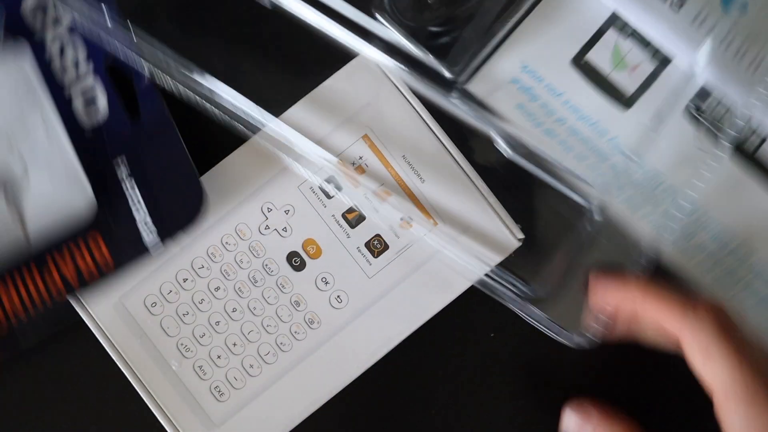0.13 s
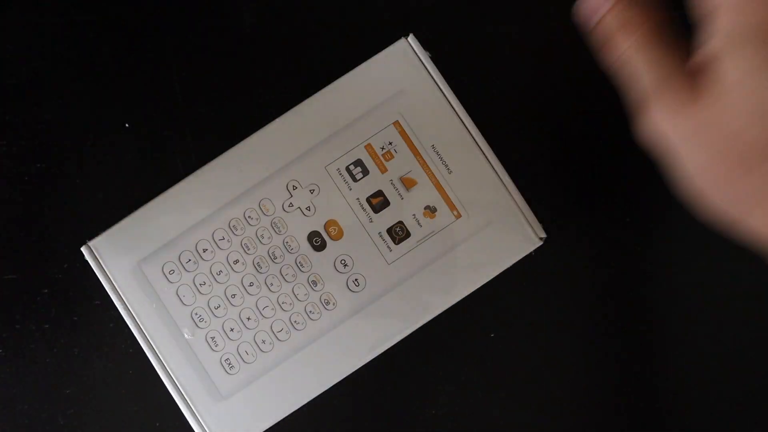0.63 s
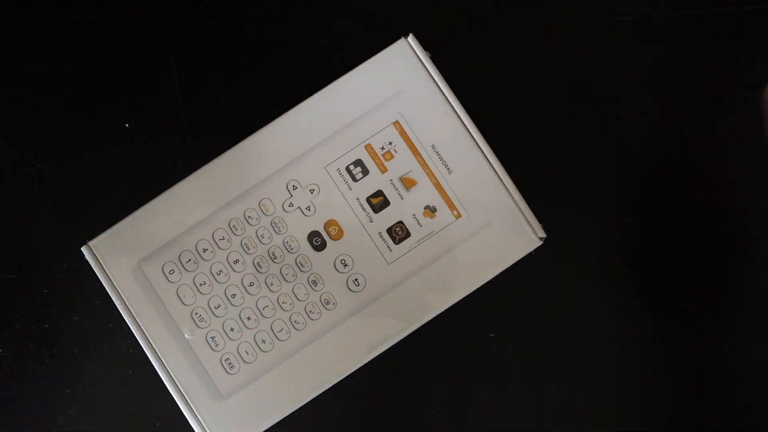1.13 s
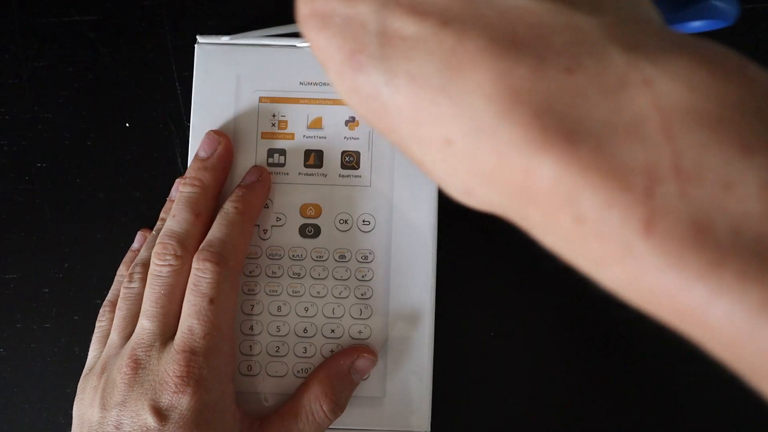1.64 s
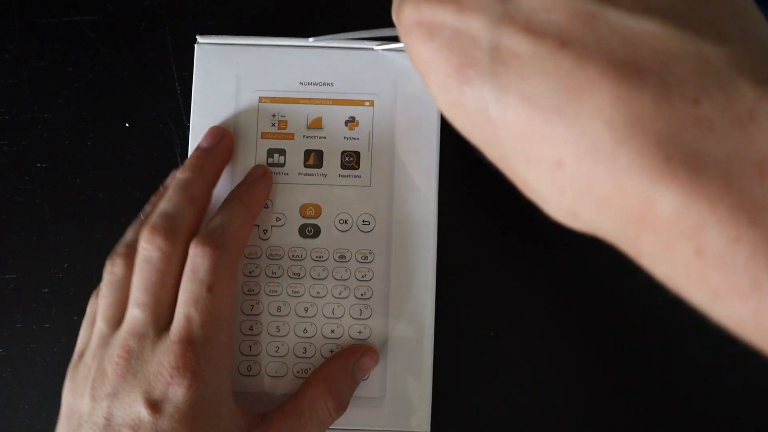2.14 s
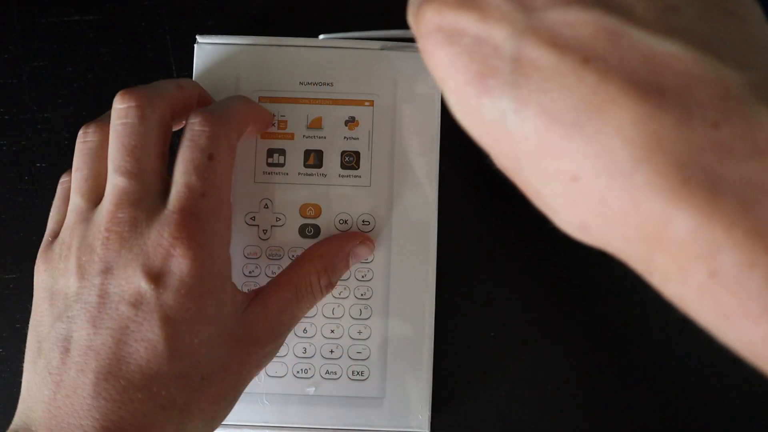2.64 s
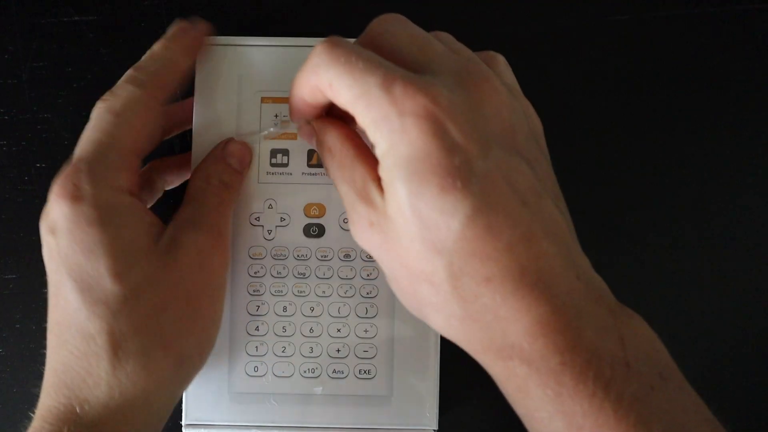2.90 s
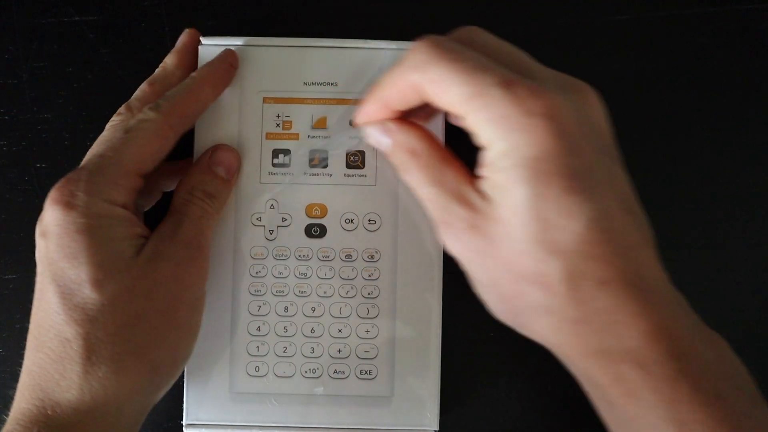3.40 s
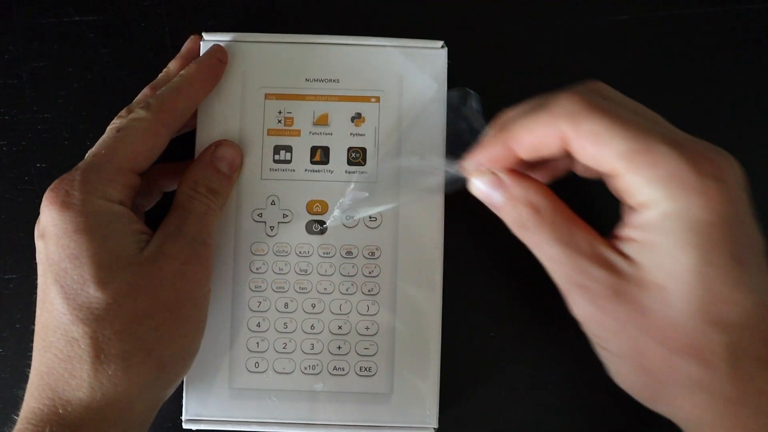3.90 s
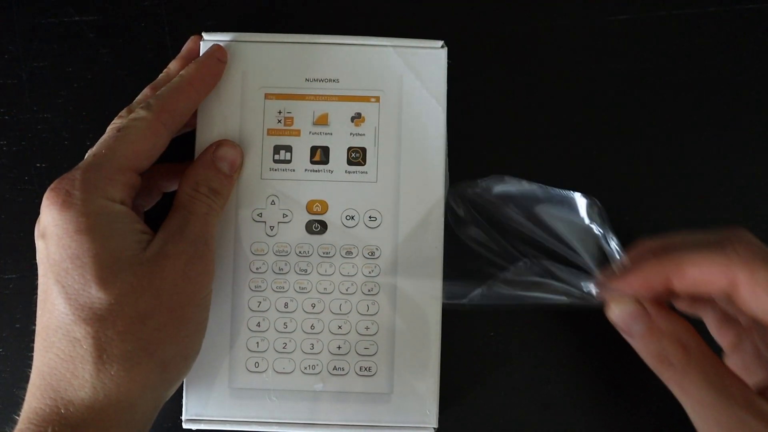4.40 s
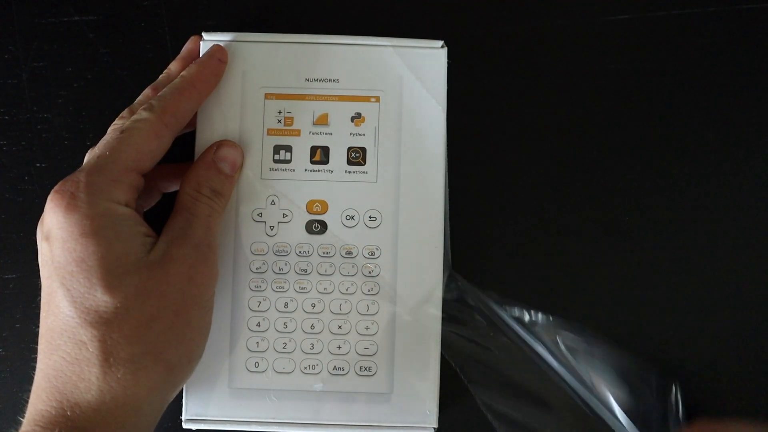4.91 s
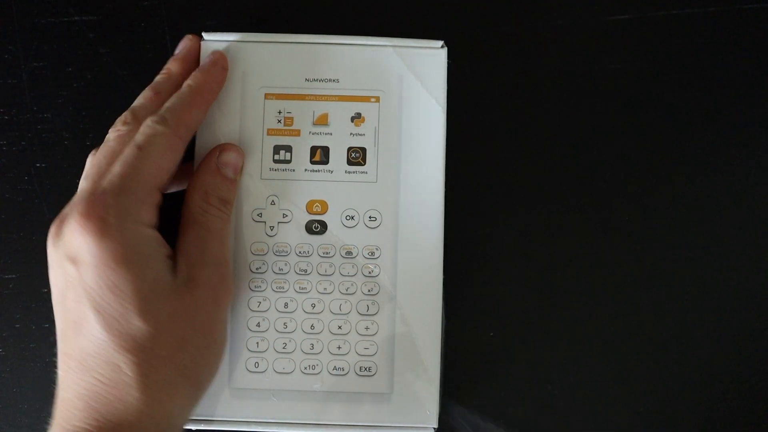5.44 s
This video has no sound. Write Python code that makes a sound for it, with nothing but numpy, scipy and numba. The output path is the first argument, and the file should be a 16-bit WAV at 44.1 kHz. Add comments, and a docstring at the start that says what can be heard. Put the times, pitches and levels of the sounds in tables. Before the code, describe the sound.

A stiff clear package is dragged away and dropped, giving dense crunches, hollow panel pops and low table knocks, the hardest overloading the close microphone. The sound is cut off suddenly. After near silence with faint hiss and rumble, clinging film comes off a box in crisp irregular snaps, with faint crinkle and soft rubbing, in a small room.

```python
"""In a small, fairly dry room, a stiff blister shell is pulled off a table, crunches, bumps it and is dropped
aside: dense crackle through shell resonances, plus ringing table and panels. A hard cut silences it.
Then fingers peel thin shrink film off a cardboard box: lone stick-slip snaps ring the box over faint crinkle,
rub and drag. Near echoes and a diffuse tail answer; hiss and rumble lie beneath; the loudest peaks clip."""
import sys
import numpy as np
from scipy import signal
from scipy.fft import rfft, irfft
from scipy.io import wavfile
from scipy.ndimage import uniform_filter1d
from numba import njit

SR = 44100
rng = np.random.default_rng(int(sys.argv[2]) if len(sys.argv) > 2 else 0)


def amplitude_ratio(level_db):
    """Convert a level in decibels to the matching linear amplitude (field) ratio."""
    exponent = np.asarray(level_db, float) / 20
    return 10 ** exponent


def store_pcm(level_fs):
    """Save levels as 16-bit WAV."""
    pcm = np.round(np.clip(level_fs, -1, 1) * 32767).astype(np.int16)
    wavfile.write(sys.argv[1], SR, np.atleast_2d(pcm).T)


N = 244755
T = np.arange(N) / SR

# Film letting go of the box. Each row: start in seconds, level in dB, film pitch in Hz, box ring in dB re level.
FILM_SNAPS = [(1.5189, -33.5, 9130, -29), (2.7404, -30.5, 4360, -16.5), (3.0284, -40, 6900, -27.5),
              (3.1351, -43, 6770, 0), (3.1777, -31.5, 7130, 3), (3.3668, -19.5, 4250, -31),
              (3.3967, -23, 8700, -17), (3.4091, -18, 6970, -19.5), (3.4303, -19.5, 8700, -38),
              (3.4513, -17, 3800, -19.5), (3.5748, -25.5, 8420, -20), (3.6979, -31, 4280, -6),
              (3.7238, -22.5, 4380, -25), (3.7494, -19.5, 4100, -21), (3.7833, -16, 4380, -25),
              (3.8337, -16, 8800, -21.5), (3.8858, -14.5, 8980, -23), (3.9416, -11.5, 9450, -25.5),
              (3.9847, -11.5, 9270, -24), (4.0176, -14, 4670, -20), (4.0592, -15, 4600, -21),
              (4.0622, -11.5, 8960, -21.5), (4.11, -15.5, 8450, -21), (4.1217, -16.5, 6046, -33),
              (4.146, -13.5, 8563, -18), (4.162, -26, 2580, -30), (4.1871, -15.5, 8070, -20),
              (4.2166, -15, 3420, -17.5), (4.2678, -24.5, 9040, -17), (4.342, -18.5, 5600, -17),
              (4.4343, -11, 6700, -16.5), (4.5514, -18.5, 7530, -10), (4.6732, -11.5, 5390, -18),
              (4.7498, -13, 7790, -19.5), (4.8415, -10, 6150, -20), (5.027, -34.5, 5750, -26),
              (5.0841, -24, 8520, -15.5), (5.1375, -13.5, 5410, -20.5), (5.1687, -19.5, 4510, -16),
              (5.214, -12.5, 5530, -25.5), (5.2397, -22.5, 4330, -13), (5.2683, -22, 6190, -15),
              (5.2951, -19, 3470, -28), (5.3271, -14.5, 3330, -21.5), (5.3498, -18, 3200, -19),
              (5.3789, -17.5, 3570, -19), (5.4036, -19, 3160, -24), (5.435, -15.5, 3210, -17),
              (5.4642, -13, 3150, -18.5), (5.4978, -16, 3320, -25), (5.5154, -22, 3290, -10.5)]
# Modes of the cardboard box. Each row: frequency in Hz, relative level in dB, t60 in seconds.
BOX_MODES = [(205, -15.5, 0.11), (406, -5, 0.03), (673, -2, 0.025), (781, -5, 0.045), (832, 3.5, 0.02),
             (1169, 4, 0.031), (1338, -9, 0.019)]


def unit(x):
    """Scale to rms 1."""
    return x / np.sqrt(np.mean(x ** 2))


def band(x, lo_hz, hi_hz):
    """Band-pass."""
    sos = signal.butter(2, [lo_hz, min(hi_hz, 0.45 * SR)], "band", fs=SR, output="sos")
    return signal.sosfilt(sos, x)


def decay(t60_s, size):
    """Exponential fall of 60 dB in t60_s."""
    return np.exp(-np.log(1000) * T[:size] / t60_s)


def decay_e(tau_s, size):
    """Exponential fall with time constant tau_s."""
    return np.exp(-T[:size] / tau_s)


def rise(rise_s, size):
    """Exponential onset with time constant rise_s."""
    return 1 - np.exp(-T[:size] / rise_s)


def ring(hz, t60_s, size):
    """One dying mode."""
    return np.sin(2 * np.pi * hz * T[:size]) * decay(t60_s, size)


def add(out, start_s, sound):
    """Mix a sound in at start_s."""
    i = int(start_s * SR)
    out[i:i + len(sound)] += sound[:N - i]


def curve(rows):
    """Columns of a table, interpolated to one value a sample."""
    s, *columns = np.transpose(rows)
    return [np.interp(T, s, column) for column in columns]


def wander(spread_db, per_s):
    """A gain that drifts at random."""
    steps = rng.standard_normal(1000)
    return amplitude_ratio(spread_db * np.interp(T * per_s, np.arange(len(steps)), steps))


def grains(per_s, spread_db, hiss):
    """Random ticks, a few much bigger than the rest, over some hiss."""
    size_db = spread_db * np.minimum(rng.exponential(size=N), 4)
    ticks = (rng.random(N) < per_s / SR) * amplitude_ratio(size_db) * rng.standard_normal(N)
    return unit(unit(ticks) + hiss * rng.standard_normal(N))


@njit
def sweep(x, hz, q):
    """State-variable band-pass whose centre can move."""
    y, band_state, low_state = np.empty(len(x)), 0., 0.
    for i in range(len(x)):
        g = np.tan(np.pi * hz[i] / SR)
        v = (band_state + g * (x[i] - low_state)) / (1 + g * (g + 1 / q))
        band_state = 2 * v - band_state
        low_state += 2 * g * v
        y[i] = v / q
    return y


def blows(rows, t60_s):
    """Soft blows ring a panel: a low note and weaker ones above it."""
    out, size = np.zeros(N), SR // 3
    for s, db, hz in rows:
        note = ring(hz, t60_s, size)
        note += 0.33 * ring(1.2 * hz, 0.84 * t60_s, size)
        note += 0.18 * ring(1.9 * hz, 1.4 * t60_s, size)
        add(out, s, amplitude_ratio(db) * note * rise(1 / hz, size))
    return out


def shell_parts():
    """Dense buckles shake the stiff sheet, heard as middle, body and edge."""
    # Each row: resonance in Hz, width in Hz, level in dB.
    resonances = [(215, 62, 10), (970, 350, 17.5), (1644, 81, 11), (1800, 17, -2), (2970, 110, 7),
                  (3667, 82, 1.5)]
    crackle = grains(2500, 0.74, 0.8)
    rings = np.zeros(N)
    for hz, width_hz, db in resonances:
        q = hz / width_hz
        rings += amplitude_ratio(db) * sweep(crackle, np.full(N, 1. * hz), q) * np.sqrt(q)
    middle = unit(band(crackle, 990, 5000)) + 0.19 * unit(band(rings, 1100, 5000))
    body = unit(band(crackle, 240, 1300)) + 0.45 * unit(band(crackle, 930, 2700))
    body += 0.58 * unit(band(rings, 100, 1300))
    edge = unit(band(crackle, 3300, 8400)) + 0.2 * unit(band(crackle, 6300, 16000))
    # a bent panel sings at a wandering pitch
    middle = unit(middle) + 0.4 * unit(sweep(crackle, 3300 * wander(3.3, 14), 5.))
    body = unit(body) + 0.42 * unit(sweep(crackle, 950 * wander(2.5, 18), 4.7))
    return [unit(middle), unit(body), unit(edge)]


def shell():
    """Flexing and bursts of buckles drive the sheet's middle, body and edge."""
    # Each row: start in seconds, level in dB, body in dB re level, edge in dB re level.
    crunches = [(0.043, -10.5, -8, 6), (0.0836, -9, -20.5, -40), (0.0901, -4.5, -13, -10),
                (0.099, 6, -12.5, 0), (0.107, -2.5, -16.5, -8.5), (0.3325, -21.5, -5, -10),
                (0.491, -27, 5, 0), (0.511, -0.5, -4, -16), (0.5177, -2.5, -2.5, -20.5),
                (0.595, -18.5, 1.5, -10.5), (0.633, -12.5, 1, -13), (0.707, -20, 4, -19),
                (0.8865, 3.5, 0.5, -6.5), (0.8908, 13.5, -13, -10), (0.918, -6, 12.5, -19.5),
                (0.955, -10.5, 1.5, -18.5), (1.049, -10, -3.5, -17), (1.1085, 2.5, -8.5, -12),
                (1.129, -11.5, 2.5, -10.5), (1.1753, -1.5, -7, -16), (1.1916, -11, -1, -19),
                (1.214, -13, -1.5, -19)]
    # Two groups, lifted then dropped aside. Each row: time in seconds, level in dB, body in dB re level.
    flexing = [
        [(0.0, -47, 9), (0.034, -54, 13), (0.046, -30.5, -1.5), (0.108, -19.5, -4), (0.268, -39.5, -3),
         (0.4, -36, 5.5), (0.49, -48, 12), (0.518, -30, 9.5), (0.572, -32.5, 9.5), (0.625, -33.5, 9.5),
         (0.665, -31, 11), (0.8, -54, 7)],
        [(0.9, -20, 1.5), (0.998, -28.5, 11), (1.102, -30, 7), (1.11, -19.5, 5), (1.21, -29, 10.5),
         (1.24, -29, 5)],
    ]
    # Burst t60 of middle, body and edge in seconds.
    crunch_t60_s = (0.038, .052, 0.059)
    crest_db = 10  # taken off each burst: peak of a dense crackle over its rms
    force = np.zeros((3, N))
    for rows in flexing:
        db, body_db = curve(rows)
        edge_db = -4.5 - 1.08 * body_db  # a broad, heavy flex stirs the thin edge less
        active = (T > rows[0][0]) * (T < rows[-1][0])
        force += amplitude_ratio(np.array([db, db + body_db, db + edge_db])) * active
    size = SR // 3
    shapes = [decay(t60_s, size) * rise(0.0017, size) for t60_s in crunch_t60_s]
    for s, db, body_db, edge_db in crunches:
        for k, re_db in enumerate((0, body_db, edge_db)):
            add(force[k], s, amplitude_ratio(db + re_db - crest_db) * shapes[k])
    # parts of the sheet stiffen and slacken apart
    force *= [wander(1.8, 45) for _ in force]
    return np.sum(force * shell_parts(), axis=0)


def bumps():
    """The shell knocks the table top, and its panels pop in and out."""
    # Table bumps. Each row: start in seconds, level in dB, pitch in Hz.
    knocks = [(0.047, -30, 215), (0.383, -14, 102), (0.489, -17.5, 105), (0.598, -13.5, 178),
              (0.66, -19, 188), (0.894, -11.5, 226), (1.0, -23.5, 248), (1.111, -14.5, 196),
              (1.191, -18, 234)]
    # Shell panels popping. Each row: start in seconds, level in dB, pitch in Hz.
    pops = [(0.111, -12, 1070), (0.333, -30, 700), (0.491, -16, 434), (0.502, -12.5, 657),
            (0.523, -14, 1030), (0.602, -19, 1040), (0.889, -7.5, 485), (1.115, -12.5, 1310)]
    return blows(knocks, t60_s=0.18) + blows(pops, t60_s=0.055)


def snap_tick(film_hz, partner_hz, box_db, size):
    """The bond lets go in a sub-millisecond bell-shaped pulse at the film's pitch."""
    release = np.exp(-((T[:size] - 0.0004) / 0.00022) ** 2)
    modes = ((film_hz, 1), (partner_hz, 0.4), (13500, 0.2))
    tick = release * sum(g * np.sin(2 * np.pi * hz * T[:size]) for hz, g in modes)
    # high, taut film lets go more sharply; a release that shakes the box more is blunter
    sharpness_db = 1 * np.log2(film_hz / 8000) - 0.11 * (box_db + 21)
    return amplitude_ratio(sharpness_db) * tick / np.abs(tick).max()


def snap_box(size):
    """The box rings, held a little differently by the hand each time."""
    box = np.zeros(size)
    for hz, db, t60_s in BOX_MODES:
        level_grip, pitch_grip = rng.standard_normal(2)
        box += amplitude_ratio(db + 1.7 * level_grip) * ring(hz * (1 + 0.022 * pitch_grip), t60_s, size)
    box *= rise(0.0013, size)
    return box / np.abs(box).max()


def snaps():
    """A sharp tick at the film's pitch, a short flutter of freed film, a slap on the card, the box ringing."""
    # How flat the freed film lies on the card. Each row: time in seconds, slap in dB re snap.
    on_card = [(3.3, -15), (3.6, -20), (3.75, -7.5), (4.25, -3), (4.58, 1.5), (4.75, -15), (5.25, -6),
               (5.32, -21)]
    out, size = np.zeros(N), 2600
    for s, db, film_hz, box_db in FILM_SNAPS:
        partner_hz = 4400 if film_hz > 7000 else 8600  # the film's other mode
        flutter_db = -11.5 - 0.06 * db  # weak snaps carry slightly more flutter
        slap_db = np.interp(s, *np.transpose(on_card))
        # smaller slips follow: a few big grains among many small
        chance = rng.standard_normal(size)
        rustle = unit(chance * np.abs(chance) ** 1.4) * decay_e(0.0066, size) * rise(0.0046, size)
        own, partner = [band(rustle, hz * 0.78, hz * 1.25) for hz in (film_hz, partner_hz)]
        flutter = own + 0.14 * partner
        flutter += 1.7 * band(rustle, 2500, 10000) + 0.62 * band(rustle, 10000, 12500)
        snap = snap_tick(film_hz, partner_hz, box_db, size) + amplitude_ratio(flutter_db) * flutter
        snap += amplitude_ratio(slap_db) * band(rustle, 1500, 3440)
        snap += amplitude_ratio(box_db) * snap_box(size)
        add(out, s, amplitude_ratio(db) * snap)
    return out


def taps():
    """Fingertips land on the box lid and ring it."""
    # Each row: start in seconds, level in dB, pitch in Hz.
    landings = [(3.134, -55, 777), (3.179, -37, 785), (3.368, -35, 823), (3.41, -33.5, 434),
                (3.43, -33.5, 786), (3.698, -43, 788)]
    return blows(landings, t60_s=0.059)


def peel():
    """Stretched film crinkles finely, fingers rub the card and ring the box, the box drags on the table."""
    # Peeling hands. Each row: time in seconds, film tension as crinkle in dB, push on the box as rub in dB.
    hands = [(2.5, -84.5, -86.5), (2.59, -63, -74), (2.66, -73, -71), (3.3, -69.5, -81), (3.41, -72, -46.5),
             (3.55, -61.5, -70), (3.67, -70.5, -69), (3.78, -58.5, -52.5), (3.96, -60, -58),
             (4.15, -54.5, -47), (4.33, -64, -60), (4.5, -61, -78), (4.74, -57.5, -57), (5.01, -64, -81.5),
             (5.13, -59, -63), (5.25, -55, -53.5), (5.55, -49.5, -53)]
    # The box sliding on the table. Each row: time in seconds, level in dB.
    sliding = [(2.3, -83), (3.65, -65), (3.8, -57), (4.0, -45.5), (4.15, -49), (4.3, -67), (4.7, -56),
               (5.0, -70), (5.18, -56), (5.55, -48.5)]
    crinkle_db, rub_db = curve(hands)
    drag_db, = curve(sliding)
    # each snap leaves the film crinkling
    stir = amplitude_ratio(crinkle_db)
    for s, db, *_ in FILM_SNAPS:
        add(stir, s, amplitude_ratio(db - 43.5) * decay_e(0.045, SR // 4))
    # the crinkle follows the pitch of the snaps, averaged over 0.18 s
    crinkle_hz = uniform_filter1d(curve(FILM_SNAPS)[1], int(0.18 * SR))
    ticks = grains(1500, 1.96, 0.32)
    crinkle = unit(sweep(ticks, np.clip(crinkle_hz, 500., 15000.), 0.97))
    crinkle += 0.33 * unit(band(ticks, 1060, 7000))
    fingers = grains(1800, 1.54, 1.41)
    box = np.zeros(N)
    for hz, db, t60_s in BOX_MODES:
        box += amplitude_ratio(db) * sweep(fingers, np.full(N, 1. * hz), hz * t60_s / 2.7)
    rub = unit(unit(band(fingers, 240, 1463)) + 0.49 * unit(box))
    drag = unit(band(rng.standard_normal(N), 92, 193))
    return stir * crinkle + amplitude_ratio(rub_db) * rub + amplitude_ratio(drag_db) * drag


def hush():
    """Room air and microphone hiss as coloured noise, with an uneven rumble from the stand under it."""
    # Noise spectrum. Each row: frequency in Hz, relative level in dB.
    spectrum = [(41, -39), (70, -19), (195, -5), (336, -8), (368, -15), (403, -10), (797, -13),
                (892, -14.5), (2780, -17), (16000, -23)]
    # Hands and table shaking the stand. Each row: time in seconds, level in dB.
    shaking = [(0.0, -43), (0.08, -34), (0.35, -47), (0.63, -31), (0.84, -58), (0.95, -37.5), (1.23, -35.5),
               (1.26, -65), (2.7, -71.5), (2.9, -65.5), (3.7, -70), (4.14, -51), (4.4, -63), (5.0, -65),
               (5.4, -53.5)]
    # The stand swaying under leaning arms. Each row: time in seconds, level in dB.
    swaying = [(0.0, -51), (1.2, -49), (1.3, -62), (2.8, -58.5), (3.3, -51), (3.85, -66.5), (4.75, -52.5),
               (5.0, -56.5), (5.3, -50.5), (5.55, -58)]
    air_db = -56.5  # rms
    hz, db = np.transpose(spectrum)
    bin_hz = np.arange(1, N // 2 + 2) * SR / N
    colour = amplitude_ratio(np.interp(np.log(bin_hz), np.log(hz), db))
    air = amplitude_ratio(air_db) * unit(irfft(rfft(rng.standard_normal(N)) * colour, N))
    deep = unit(band(band(rng.standard_normal(N), 35, 49), 35, 49))
    deep += 0.8 * unit(band(rng.standard_normal(N), 8, 24))
    upper = unit(band(band(rng.standard_normal(N), 60, 125), 60, 125))
    shaking_db, = curve(shaking)
    sway_db, = curve(swaying)
    return air + amplitude_ratio(sway_db) * wander(3., 5.4) * deep + amplitude_ratio(shaking_db) * upper


def room(x, echo_db, tail_db):
    """Direct sound, near echoes and a diffuse tail; the hands move, so the paths keep changing."""
    # Table and nearby things. Each row: delay in seconds, level in dB.
    echoes = [(.0022, -7), (.0047, -14), (.0072, -13), (.0105, -18), (.015, -18)]
    # Tail bands. Each row: frequency in Hz, t60 in seconds.
    tail_t60_s = [(300, 0.9), (1000, 0.26), (3000, 0.36), (7000, 0.31), (13000, 0.024)]
    size, hop = SR // 2, 4096
    out, fade = np.zeros(N + size + 2 * hop), np.hanning(2 * hop + 1)[:-1]
    decays = [(hz, decay(t60_s, size)) for hz, t60_s in tail_t60_s]
    tails = []
    for _ in range(8):
        tails.append(sum(band(rng.standard_normal(size), hz * 0.45, hz * 1.45) * fall for hz, fall in decays))
    x = np.r_[np.zeros(hop), x, np.zeros(2 * hop)]
    # overlapping blocks, each with its own response
    for k, i in enumerate(range(0, N + hop, hop)):
        response = tails[k % 8] * amplitude_ratio(tail_db) * rise(0.0066, size)
        response[0] = 1
        for (s, db), moved in zip(echoes, rng.standard_normal(len(echoes))):
            response[int(s * SR * (1 + 0.04 * moved))] += amplitude_ratio(db + echo_db)
        wet = signal.fftconvolve(x[i:i + 2 * hop] * fade, response)[:len(out) - i]
        out[i:i + len(wet)] += wet
    return out[hop:hop + N]


def scene():
    """The cut silences shell and room tail within 2 ms; film and box follow, over quiet hiss and uneven rumble."""
    cut_s = 1.237
    before_cut = np.clip((cut_s - T) / 0.002, 0, 1)
    # the shell's dense crackle has weak near echoes
    unpacking = room(shell(), echo_db=-13.5, tail_db=-34.5) + bumps()
    peeling = room(snaps() + taps() + peel(), echo_db=-4.0, tail_db=-37.5)
    return (unpacking * before_cut + peeling + hush())[None]


def low_pass(x):
    """Removes everything above the highest recorded frequency."""
    return signal.sosfilt(signal.butter(12, 16230, fs=SR, output="sos"), x)


def record(dry):
    """The input clips at full scale."""
    clipped = np.clip(dry, -1, 1)
    return low_pass(clipped)


dry = scene()
out = record(dry)
store_pcm(out)
```